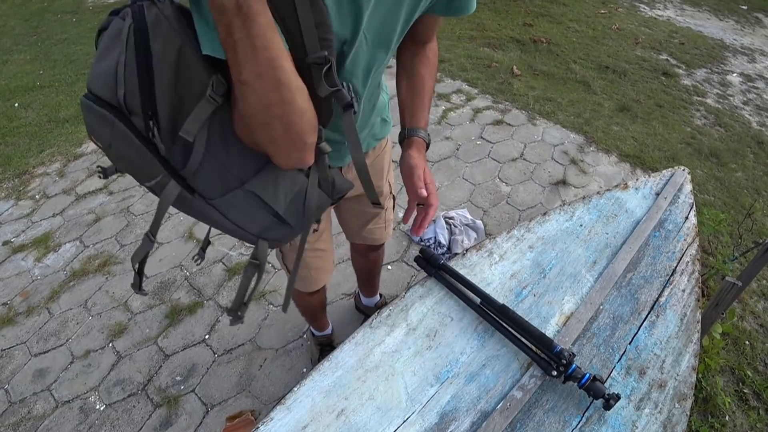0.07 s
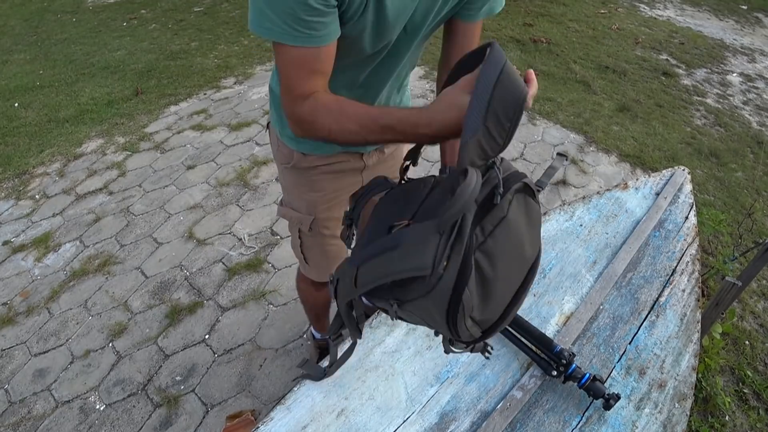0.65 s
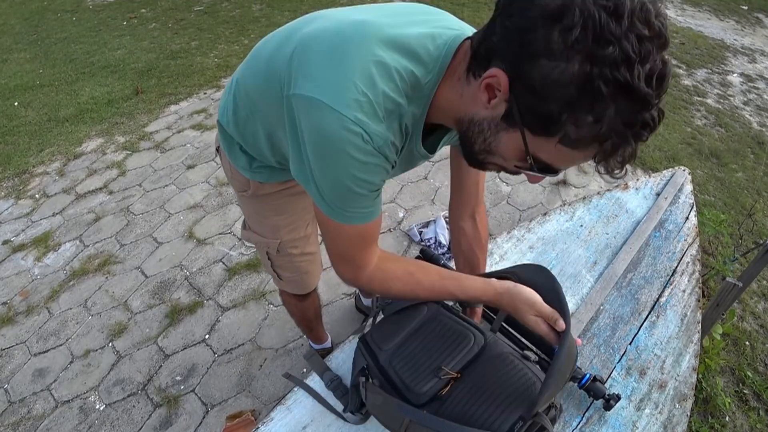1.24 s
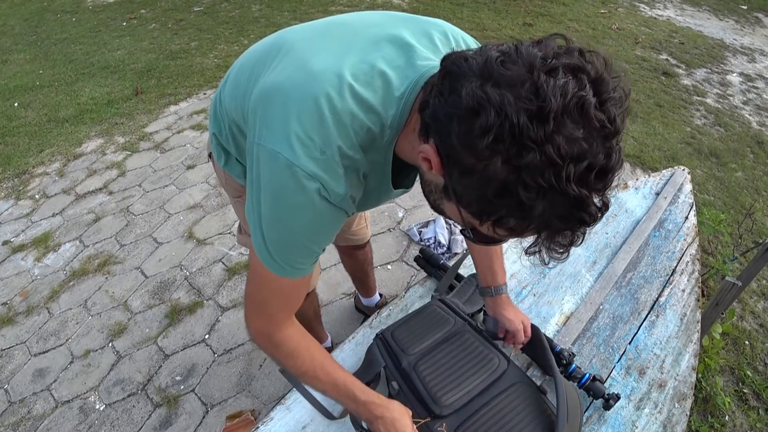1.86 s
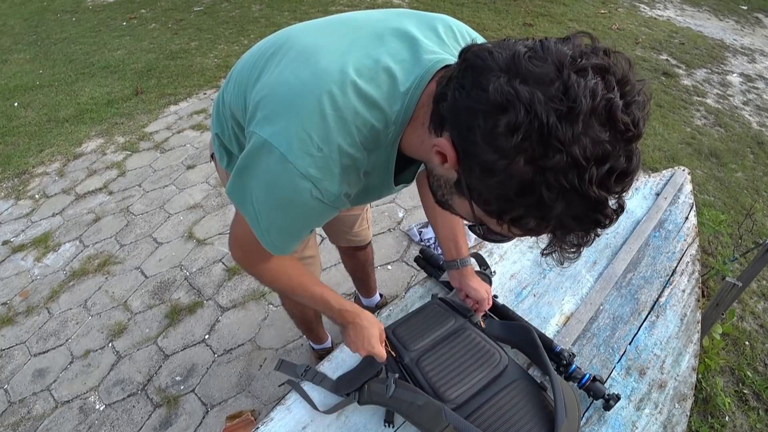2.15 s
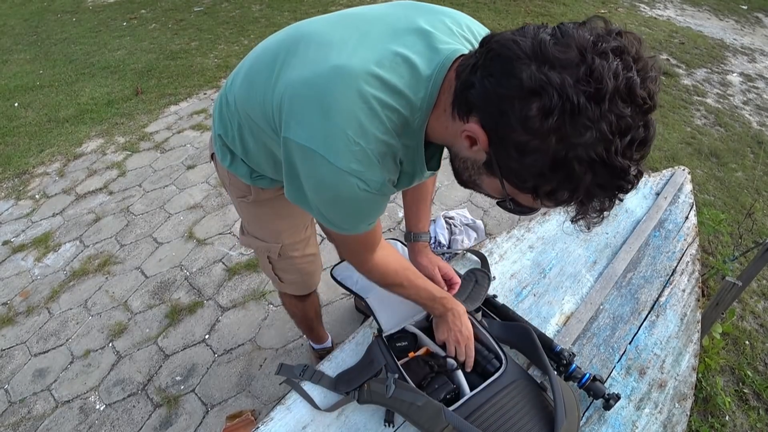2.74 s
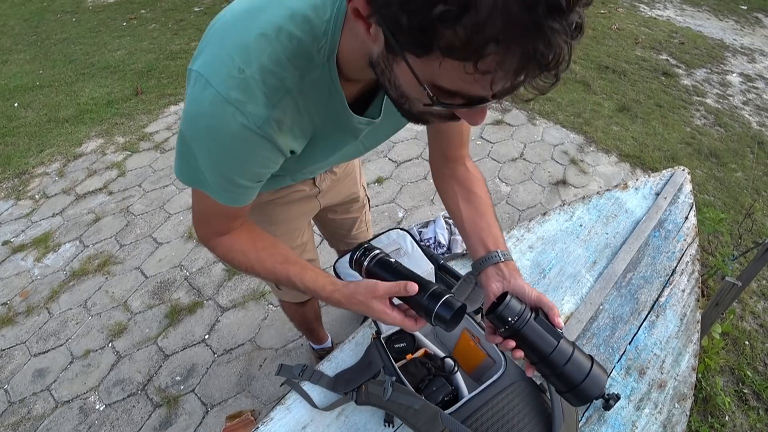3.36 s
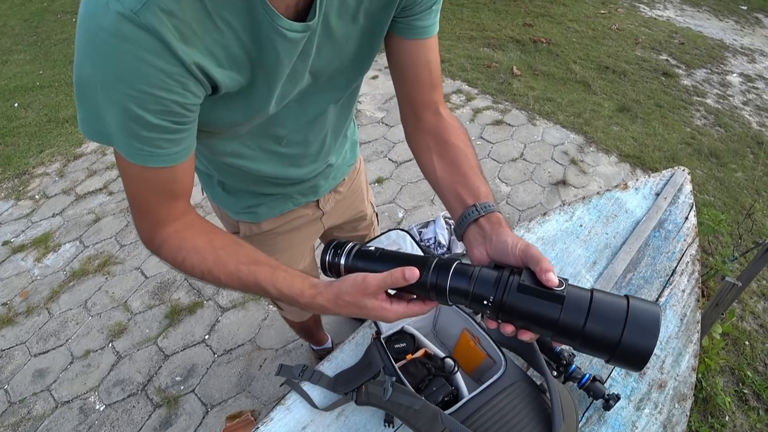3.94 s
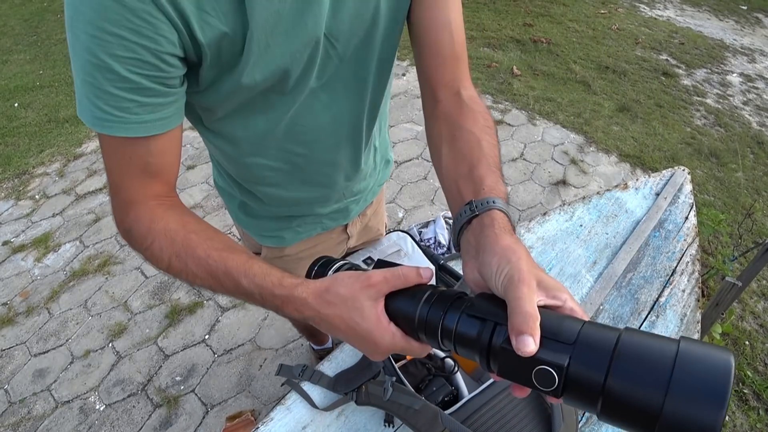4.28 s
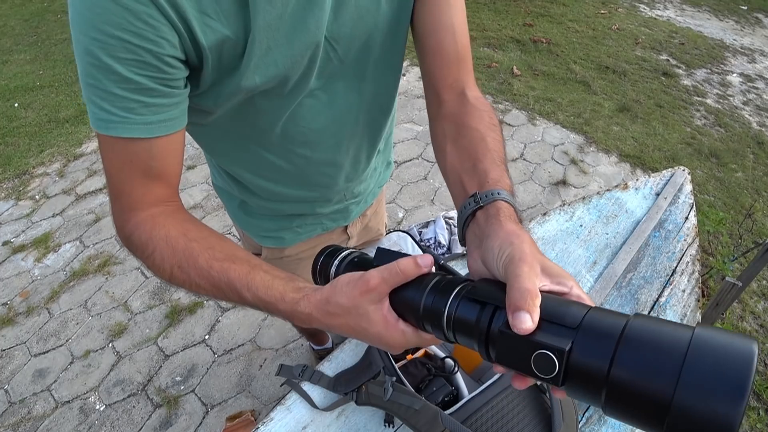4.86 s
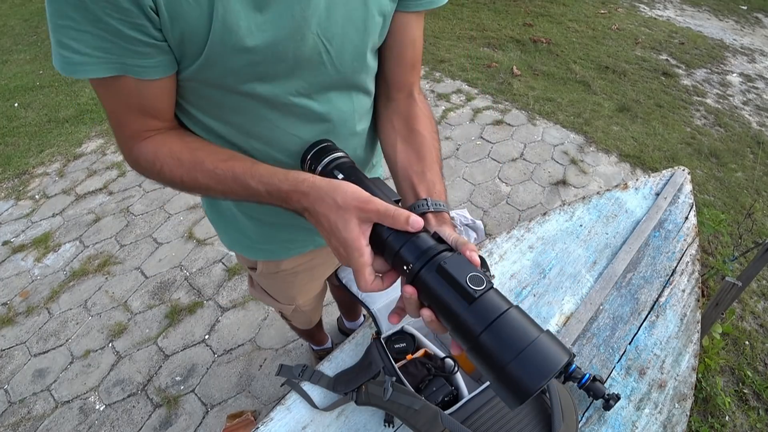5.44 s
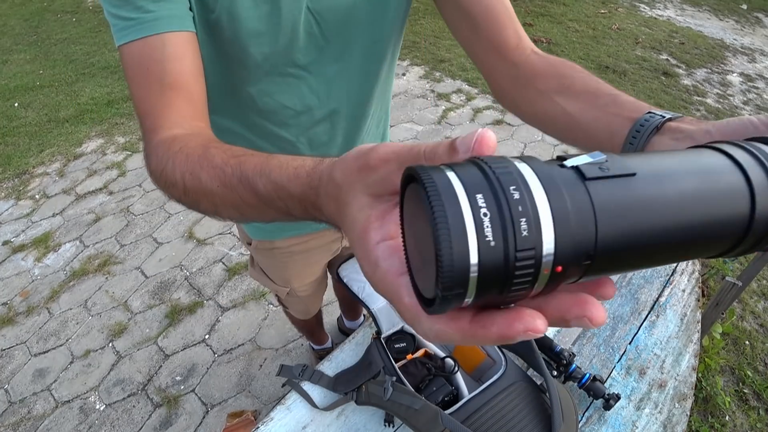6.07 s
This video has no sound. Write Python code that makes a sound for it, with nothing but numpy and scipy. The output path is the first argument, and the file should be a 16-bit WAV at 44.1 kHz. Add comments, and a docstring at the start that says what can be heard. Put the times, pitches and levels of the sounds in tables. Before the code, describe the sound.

In the open air, gusts rumble on the microphone above a faint wash of surf. Nylon rustles and buckles tap as a padded bag is swung down and thuds onto an upturned boat. Its zipper runs open, and light clinks follow as hands reach inside. The second half brings the sharpest sounds: a lens being handled, with clusters of hard clicks, brief scrapes, soft finger rubbing and bright metallic rattles.

```python
"""A nylon camera backpack is swung off a shoulder, set on an upturned boat and unzipped by the sea.
Friction makes its weave hiss, its padding buckles, the hull thuds, and a slider trips over zip teeth.
A long lens is lifted out and fitted to its mount: impacts excite damped plastic shells, stick-slip
friction gives short scrapes, and a small loose metal part jingles in its free modes.
Turbulent wind bumps the microphone over a faint wash of surf."""
import sys
import numpy as np
from scipy import signal
from scipy.fft import rfft, irfft
from scipy.io import wavfile
from scipy.ndimage import uniform_filter1d, minimum_filter1d

SR = 44100
rng = np.random.default_rng(int(sys.argv[2]) if len(sys.argv) > 2 else 0)


def put_to_file(sound):
    """Save the sound as 16-bit audio at rate SR, in the file named by the first command-line argument."""
    columns = np.atleast_2d(sound).T  # one column per channel
    safe = np.clip(columns, -1, 1)
    whole_steps = np.round(safe * 32767)
    wavfile.write(sys.argv[1], SR, whole_steps.astype(np.int16))


N = 269451
TIME = np.arange(N) / SR

# Modes of the loose metal part. Each row: frequency in Hz, relative level in dB, T60 in seconds.
METAL_MODES = [(1680, -13, .045), (2330, -17, .03), (3240, -9, .06), (4535, 0, .06), (4800, -7, .022),
               (5750, -11, .02), (8335, 0, .065), (8650, -8, .02), (9365, -1, .055), (12985, 2, .05)]


def gain_of(db):
    """Amplitude grows tenfold for every 20 dB."""
    return 10 ** (np.asarray(db) / 20)


def unit_rms(x):
    """Normalises a signal to unit mean power."""
    return x / np.sqrt(np.mean(x ** 2) + 1e-20)


def equal_energy(x):
    """Normalises a transient to the energy of unit power held for 6 ms."""
    return x * np.sqrt(.006 * SR / (np.sum(x ** 2) + 1e-20))


def spectrum_db(points, hz):
    """Interpolates a spectrum on a logarithmic frequency axis."""
    knots_hz, db = np.transpose(points)
    return np.interp(np.log(hz + 1), np.log(knots_hz + 1), db)


def follow(rows):
    """Interpolates pairs of time and value linearly at every sample."""
    return np.interp(TIME, *np.transpose(rows))


def coloured(x, points):
    """Zero-phase filtering imposes a spectral envelope; the result has unit power."""
    response = gain_of(spectrum_db(points, np.fft.rfftfreq(N, 1 / SR)))
    return unit_rms(irfft(rfft(x) * response, N))


def band(x, lo_hz, hi_hz, order=2):
    """A causal, maximally flat band-pass filter."""
    edges_hz = [lo_hz, min(hi_hz, SR / 2 - 100)]
    return signal.sosfilt(signal.butter(order, edges_hz, "band", fs=SR, output="sos"), x)


def resonate(x, hz, width_hz):
    """A driven, damped resonator of unit peak gain, whose frequency may move."""
    carrier = np.exp(2j * np.pi * np.cumsum(hz * np.ones(len(x))) / SR)
    pole = np.exp(-np.pi * width_hz / SR)
    return 2 * (carrier * signal.lfilter([1 - pole], [1, -pole], x / carrier + 1e-18)).real


def wander(per_s):
    """Random modulation: straight lines join normally distributed values."""
    knots = rng.standard_normal(N // 20)
    return np.interp(TIME * per_s, np.arange(len(knots)), knots)


def slips(per_s, spread_db):
    """Stick-slip friction is a random train of impulses, a few of them large."""
    size = gain_of(spread_db * np.minimum(rng.exponential(1, N), 4)) * rng.choice([-1, 1], N)
    return unit_rms(size * (rng.random(N) < per_s / SR))


def stroke(start, end, attack_s, release_s):
    """The envelope of one move rises linearly, holds, and decays exponentially."""
    return np.clip((TIME - start) / attack_s, 0, 1) * np.exp(-np.clip((TIME - end) / release_s, 0, 20))


def strokes(rows, attack_s, release_s):
    """The envelope of a series of moves follows the strongest at each moment."""
    return np.max([gain_of(db) * stroke(start, end, attack_s, release_s) for start, end, db in rows], 0)


def add(mix, start, sound):
    """Superposes a sound on the mix from a start in seconds."""
    part = mix[max(round(start * SR), 0):][:len(sound)]
    part += sound[:len(part)]


def ring(modes, scatter_db):
    """Free vibration: one decaying sinusoid per mode, with random phase and scattered strength."""
    hz, db, t60 = np.transpose(modes)[:, :, None]
    t = TIME[:SR // 4]
    strength_db = db + scatter_db * rng.standard_normal(hz.shape)
    return gain_of(strength_db - 60 * t / t60) * np.sin(2 * np.pi * (hz * t + rng.random(hz.shape)))


def small_radiator(x):
    """A body much smaller than the wavelength radiates almost no bass."""
    return band(x, 1800, 15000, order=3)


def nylon_swish():
    """Sliding friction makes the weave hiss against a shirt and against itself."""
    # Spectrum of sliding nylon. Each row: frequency in Hz, relative level in dB.
    spectrum = [(150, -14), (500, -15), (1100, -9), (2200, -3), (4200, -1), (6500, -5.5), (9000, -7.5),
                (12000, -6), (15500, -7)]
    # Moves of the bag. Each row: start and end in seconds, level in dB.
    swishes = [(-0.03, .22, -23), (.22, .67, -28.5), (.65, .86, -36), (.85, 1.19, -32), (1.19, 1.55, -38),
               (1.55, 1.68, -32), (1.68, 1.8, -25.5), (1.8, 1.97, -42.5), (1.95, 2.14, -32),
               (2.12, 2.45, -27.5)]
    sliding = slips(per_s=7000, spread_db=3)
    snags = slips(per_s=64, spread_db=4.5)
    threads = coloured(sliding + .19 * snags, spectrum)
    # Patches of cloth tighten and slacken, so their ribbed weave sings at shifting pitches.
    ribs = sum(resonate(threads, hz * np.exp(.12 * wander(per_s=14)), width_hz=260)
               for hz in (1400, 2300, 3800, 8300))
    weave = unit_rms(threads + .17 * ribs) * gain_of(2 * wander(per_s=150))
    return weave * strokes(swishes, attack_s=.03, release_s=.025)


def padding_crumple():
    """Folds of padding buckle in coarse lumps as the load builds and settles."""
    # Spectrum of buckling padding. Each row: frequency in Hz, relative level in dB.
    spectrum = [(50, -31), (120, -16), (250, 7), (480, 1.5), (900, -0.5), (1500, -2.5), (2500, -8.5),
                (5000, -23)]
    # Loadings of the bag. Each row: peak time in seconds, relative level in dB,
    # seconds to build by 20 dB, seconds to settle by 20 dB.
    crumples = [(.42, -36, 0.4, .5), (.874, -23, 0.05, 0.33), (1.14, -17, 0.09, 0.06),
                (1.202, -18.5, .005, 0.09), (1.398, -15.5, .1, 0.1), (1.477, -25.5, 0.04, 0.24)]
    folds = coloured(slips(per_s=3000, spread_db=2), spectrum) * gain_of(2 * wander(per_s=70) - 3.5)
    load_db = np.max([db - 20 * np.maximum((peak - TIME) / build_s, (TIME - peak) / settle_s)
                      for peak, db, build_s, settle_s in crumples], axis=0)
    return folds * gain_of(load_db)


def wind():
    """Turbulent pressure buffets the microphone, deeper in the stronger gusts."""
    # Gusts. Each row: start and end in seconds, level in dB.
    gusts = [(-0.04, .05, -38.5), (.92, 1.05, -37), (1.36, 1.52, -32.5), (1.66, 1.74, -38.5),
             (1.84, 1.95, -33), (1.95, 2.11, -26.5), (2.19, 2.22, -36), (2.71, 2.94, -35.5),
             (3.125, 3.2, -23.5), (3.22, 3.32, -28), (3.37, 3.46, -37.5), (3.465, 3.55, -27),
             (3.6, 3.72, -37.5), (3.87, 4.0, -34), (4.44, 4.55, -42.5), (5.95, 6.08, -41)]
    # Spectrum of the buffeting. Each row: frequency in Hz, relative level in dB.
    spectrum = [(22, -32), (45, -27), (75, -0.5), (140, 4), (220, -6), (350, -16), (600, -43),
                (1500, -45.5)]
    breeze = gain_of(-48 + 3 * wander(per_s=9))
    strength = np.maximum(breeze, strokes(gusts, attack_s=.028, release_s=.062))
    buffet = coloured(rng.standard_normal(N), spectrum)
    rumble = unit_rms(band(rng.standard_normal(N), 45, 116.6, order=3))
    buffet += np.minimum(strength / gain_of(-34), 1) * rumble
    running_rms = np.sqrt(uniform_filter1d(buffet ** 2, size=1800))
    return strength * buffet / running_rms


def surf():
    """Distant waves sum incoherently to a broadband noise that swells slightly."""
    # Spectrum of the surf. Each row: frequency in Hz, relative level in dB.
    spectrum = [(30, -27), (70, 7.5), (150, 10), (400, 4.5), (1000, 0), (1800, -1.5), (4000, -9.5),
                (8000, -22), (15000, -12.5)]
    return coloured(rng.standard_normal(N), spectrum) * gain_of(-50 + .5 * wander(per_s=1.45))


def plastic_clacks():
    """Impact excitation: hard edges skid, catch and rebound, driving a heavily damped shell."""
    # Knocks of buckles and lens parts, and of the zip slider at its stop. Each row: time in seconds, shell
    # level in dB, # shell resonance in Hz, crack level in dB, hollow knock level in dB, contact T60 in seconds.
    # Levels are relative.
    impacts = [(0.2853, -22, 5750, -25, -37, 0.026), (.3361, -24, 2740, -24, -54, 0.011),
               (.5349, -26, 2500, -26, -58, 0.009), (.6047, -22, 5680, -19.5, -48, .014),
               (.6298, -12, 1610, -38, -33, 0.019), (.6393, -21, 1800, -28, -46, .01),
               (.6696, -19.5, 3120, -25, -38, 0.011), (0.8728, -18, 1080, -27.5, -29, .02),
               (.9756, -17.5, 3840, -39, -25.5, .01), (1.003, -19.5, 3870, -15.5, -50, 0.0082),
               (1.102, -16.5, 1060, -34, -48, 0.016), (1.1192, -13.5, 1770, -35, -17, .004),
               (1.134, -16, 980, -37, -40, .02), (1.151, -14, 4600, -12.5, -42, 0.012),
               (1.2033, -13, 1450, -19.5, -19.5, .008), (1.288, -25.5, 3200, -45, -52, 0.0054),
               (1.3492, -13, 1400, -34, -50, 0.033), (1.3704, -20, 1360, -35, -18, 0.022),
               (1.5579, -26, 3130, -25.5, -41, .01), (1.592, -26, 3400, -16.5, -35, 0.014),
               (1.609, -25, 2240, -16.5, -37, 0.0072), (1.999, -14, 1590, -24, -41, .028),
               (2.458, -21.5, 1700, -23.5, -45, 0.016), (2.6199, -35, 5600, -18, -29, 0.013),
               (2.627, -47, 5400, -22, -33, 0.014), (2.7839, -30, 1940, -27.5, -40, 0.0078),
               (2.8389, -33.5, 3670, -40, -44, .018), (3.7525, -18.5, 2900, -22.5, -34, 0.019),
               (3.8559, -11, 2800, -13, -45, 0.012), (3.9276, -30, 2920, -35, -55, 0.013),
               (4.1107, -14, 1870, -18.5, -34, 0.017), (4.2597, -14.5, 2050, -14, -33, 0.047),
               (4.2678, -0.5, 2050, 0, -11, 0.024), (4.5331, -20, 2130, -14.5, -52, 0.036),
               (4.5446, -11.5, 2200, -11, -31, 0.026), (4.559, -3.5, 3230, 0.5, -18.5, 0.026),
               (4.5968, -8.5, 5060, -19, -60, 0.022), (5.0115, -10, 2230, -16, -33, .02),
               (5.0161, -5.5, 2170, 1, -29, 0.019), (5.094, -7, 4530, -11, -38, 0.0083),
               (5.0996, -1.5, 3920, -2.5, -30.5, 0.015), (5.2472, -9.5, 2620, -9.5, -60, 0.035),
               (5.3268, -19, 2720, -17.5, -50, .013), (5.3557, -17, 2690, -15.5, -60, 0.022),
               (5.3683, -14.5, 3270, -13.5, -55, 0.0069), (5.4117, -29.5, 3140, -36, -46, .012),
               (5.6384, -5.5, 3860, 0, -55, 0.016), (5.683, -9, 2480, -7, -55, .014)]
    skid_db, skid_t60_s = -33.5, .21
    out, lead = np.zeros(N), SR // 35
    t = TIME[:SR // 9] - lead / SR
    from_peak = np.where(t < 0, -t * 2.6, t)  # the force builds faster than it dies
    for time, shell_db, hz, crack_db, knock_db, t60 in impacts:
        # A brief hard contact lies inside a softer, longer skid.
        contact = gain_of(-60 * from_peak / t60) + gain_of(skid_db - 60 * from_peak / skid_t60_s)
        force = equal_energy(rng.choice([-1, 1], len(t)) * contact) + .22 * equal_energy(1. * (t == 0))
        low_edge_hz = np.clip(.79 * hz, 800, 2100)
        broad = equal_energy(band(force, low_edge_hz, 3990, order=3))
        resonant = equal_energy(resonate(band(force, low_edge_hz, 5050), hz, width_hz=420))
        shell = gain_of(shell_db) * equal_energy(broad + 1.64 * resonant)
        crack = gain_of(crack_db) * equal_energy(band(force, 3910, 13900, order=3))
        knock = gain_of(knock_db + 1) * equal_energy(band(force, 193, 1000))
        add(out, time - .0005 - lead / SR, shell + crack + knock)
    return gain_of(-1.5) * out


def scrapes():
    """Short bursts of stick-slip friction drive the resonance of what is rubbed."""
    # Scrapes of straps, fingers and lens barrel.
    # Each row: start and end in seconds, level in dB, resonance in Hz.
    slides = [(0.402, 0.443, -28.5, 1900), (0.612, 0.665, -28.5, 1520), (0.946, 0.978, -24.5, 2360),
              (1.092, 1.155, -24.5, 1400), (1.19, 1.232, -28, 1400), (1.4, 1.464, -36, 1100),
              (1.838, 1.984, -38, 2200), (2.014, 2.11, -29.5, 3400), (2.597, 2.63, -40.5, 1470),
              (2.941, 2.98, -34.5, 8000), (2.327, 2.405, -23.5, 2400), (3.791, 3.884, -30, 2580),
              (4.071, 4.156, -36, 2000), (4.535, 4.573, -19, 2190), (4.603, 4.682, -35, 2380),
              (4.784, 4.83, -37, 2550), (4.815, 4.828, -25, 2670), (5.299, 5.345, -36, 2900),
              (4.985, 5.025, -31.5, 1970), (5.238, 5.282, -27, 2680), (5.583, 5.738, -37.5, 2800),
              (5.785, 5.85, -26.5, 3100), (5.831, 5.958, -33, 2940), (5.882, 5.931, -29.5, 2770)]
    out, friction = np.zeros(N), slips(per_s=3800, spread_db=4)
    for start, end, db, hz in slides:
        burst = friction[round(start * SR):][:round((end - start) * SR)]
        rasp = band(burst, min(.6 * hz, 2200), 3.6 * hz)
        sound = unit_rms(unit_rms(rasp) + 1.35 * unit_rms(resonate(rasp, hz, width_hz=510)))
        add(out, start, gain_of(db) * sound * signal.windows.tukey(len(sound), .5))
    return out


def thuds():
    """A soft impact swells over a few milliseconds into one low, quickly damped mode."""
    # The bag and the hull under it taking weight.
    # Each row: start in seconds, relative level in dB, frequency in Hz, T60 in seconds.
    blows = [(.875, -29, 340, .14), (.905, -19.5, 407, .07), (.954, -18, 230, 0.058),
             (.986, -21, 182.5, .18), (1.019, -17.5, 278, .07), (1.116, -21.5, 209, .07),
             (1.396, -14.5, 255, 0.072), (1.863, -20.5, 204, .05), (1.977, -16.5, 257.4, .14),
             (2.237, -14, 280, 0.094), (2.673, -19, 807, 0.022), (2.676, -12.5, 560, 0.021),
             (2.68, -31, 345, 0.063), (3.15, -22.5, 170.7, 0.26), (3.752, -19.5, 336, 0.094)]
    out, t = np.zeros(N), TIME[:SR // 4]
    swell = 1 - np.exp(-t / .0032)
    for start, db, hz, t60 in blows:
        add(out, start, gain_of(db + 5.5 - 60 * t / t60) * swell * np.sin(2 * np.pi * hz * t))
    return out


def tab_ping():
    """A zip tab, struck once, vibrates freely in its inharmonic modes."""
    # Modes of the tab. Each row: frequency in Hz, relative level in dB, T60 in seconds.
    tab_modes = [(4377, 0, .095), (4560, -5, .05), (12050, 10, .025), (12480, 5, .025)]
    out = np.zeros(N)
    add(out, start=1.1505, sound=gain_of(-11) * ring(tab_modes, scatter_db=0).sum(0))
    return small_radiator(out)


def metal_chatter():
    """After a jolt the loose metal rebounds many times; each bounce excites its impulse response."""
    # Bouts of chatter. Each row: start and end in seconds, relative level in dB.
    bouts = [(1.496, 1.514, -24.5), (2.871, 2.893, -34), (2.988, 3.011, -22.5), (4.27, 4.355, -13),
             (4.55, 4.603, -15), (5.016, 5.081, -12), (5.105, 5.143, -13.5)]
    fade_db, edge_s = -4.5, .0053
    envelope = sum(gain_of(follow([(start, db), (end, db + fade_db)]))
                   * stroke(start, end, edge_s, edge_s) for start, end, db in bouts)
    bounces = slips(per_s=1000, spread_db=.8) * envelope
    response = ring(METAL_MODES, scatter_db=1).sum(0)
    ringing = signal.oaconvolve(bounces, response / np.linalg.norm(response))[:N]
    scraping = band(bounces, 1440, 7700)
    return small_radiator(gain_of(-2.5) * ringing + gain_of(-1.5) * scraping)


def slider(teeth_per_s):
    """A slider trips over the teeth in a quasi-periodic impulse train and rasps between them."""
    teeth_passed = np.cumsum(teeth_per_s * (1 + .042 * wander(per_s=260))) / SR
    trips = np.diff(np.floor(teeth_passed), prepend=0)
    ticks = unit_rms(trips * gain_of(2.2 * rng.standard_normal(N)))
    rasp = unit_rms(rng.standard_normal(N) * np.exp(-(teeth_passed % 1) / .5))
    return ticks + .5 * rasp


def zipper():
    """Forced vibration: two sliders drive the cloth and the taut flap, which radiate the tooth impacts."""
    # Pace of the leading slider. Each row: time in seconds, speed in teeth per second.
    pace = [(1.56, 245), (1.74, 372), (1.9, 214), (2.04, 326), (2.12, 312), (2.18, 409), (2.245, 305),
            (2.3, 370), (2.46, 265)]
    # Response of the cloth. Each row: frequency in Hz, relative level in dB.
    cloth_response = [(40, -25), (120, 1), (320, 4), (520, -4.5), (950, 0.5), (1500, -2), (2300, -4),
                      (3400, -7), (6000, -17.5), (9000, -18), (13000, -20)]
    # Pulls on the zip; the flap's resonance glides as the slider rounds the bag. Each row: start and
    # end in seconds, first and last relative level in dB, first and last flap resonance in Hz.
    pulls = [(1.56, 1.71, -42.5, -19, 2160, 1850), (1.69, 1.815, -21, -23, 1830, 1690),
             (1.82, 1.97, -33, -28, 2010, 1730), (1.97, 2.3, -28.5, -21.5, 1170, 1399),
             (2.28, 2.46, -22.5, -22.5, 1410, 1870)]
    db_per_doubling, usual_teeth_per_s = 6, 331  # a faster slider is louder
    speed = follow(pace)
    teeth = slider(speed) + .45 * slider(speed * .85 * np.exp(.13 * wander(per_s=14)))
    # Bending waves along the tape are dispersive: the treble arrives before the bass.
    lag_turns = .06 * np.sqrt(np.fft.rfftfreq(N, 1 / SR))
    dispersed = irfft(rfft(teeth) * np.exp(-2j * np.pi * lag_turns), N)
    cloth = coloured(dispersed, cloth_response)
    pull, flap_hz = np.zeros(N), np.full(N, pulls[0][4])
    for start, end, first_db, last_db, first_hz, last_hz in pulls:
        effort = gain_of(follow([(start, first_db), (end, last_db)]))
        pull = np.maximum(pull, effort * stroke(start, end, attack_s=.011, release_s=.01))
        flap_hz = np.where(TIME < start, flap_hz, follow([(start, first_hz), (end, last_hz)]))
    flap = unit_rms(resonate(cloth, flap_hz * np.exp(.08 * wander(per_s=22)), width_hz=280))
    speed_gain = gain_of(db_per_doubling * np.log2(speed / usual_teeth_per_s))
    return unit_rms(cloth + .61 * flap) * pull * speed_gain


def hand_rubs():
    """Friction of skin on the gear gives a soft noise whose resonances shift with the grip."""
    # Spectrum of rubbing skin. Each row: frequency in Hz, relative level in dB.
    spectrum = [(300, -6.5), (1000, -3), (2000, -2), (5000, -2), (7000, -6.5), (9000, -6), (12000, -14),
                (15500, -5)]
    # Shifts of the hands. Each row: start and end in seconds, relative level in dB.
    shifts = [(2.42, 2.66, -42.5), (2.66, 3.03, -46), (3.03, 3.7, -58), (3.72, 3.87, -42.5),
              (4.0, 5.45, -45.5), (5.45, 5.75, -50.5), (5.75, 6.02, -43.5)]
    rub = coloured(slips(per_s=6000, spread_db=4), spectrum)
    grip = sum(resonate(rub, hz * np.exp(.15 * wander(per_s=7)), width_hz=350) for hz in (1900, 5000))
    flicker = gain_of(.8 * wander(per_s=25) + 1.5)
    return unit_rms(rub + grip) * flicker * strokes(shifts, attack_s=.026, release_s=.068)


def metal_clinks():
    """The loose metal slides up to each impact, ticks on contact and rings in its free modes."""
    # Strikes. Each row: time in seconds, relative tick level in dB, relative ring level in dB.
    strikes = [(2.5846, -13, -25.5), (2.983, -13.5, -34), (2.9903, -13, -27), (3.021, -12, -24.5),
               (3.04, -13.5, -31.5), (3.0855, -12, -29), (3.0944, -14.5, -28), (3.1217, -19, -39.5),
               (3.5761, -15, -28.5), (3.775, -21.5, -46), (3.8629, -17, -45), (3.946, -21, -44),
               (4.0014, -26.5, -52), (4.1294, -15.5, -52), (4.2904, -13, -21), (4.2975, -14, -27),
               (4.334, -12, -18), (4.345, -8.5, -35), (4.3888, -22, -35.5), (4.589, -18, -25.5),
               (4.698, -29.5, -49), (4.8258, -8, -32.5), (5.0225, -6, -26), (5.071, -7.5, -19.5),
               (5.161, -11.5, -35)]
    tick_t60_s, slide_t60_s = .026, .085
    out, t = np.zeros(N), TIME[:SR // 4]
    mode_db = np.where(np.transpose(METAL_MODES)[0] > 7000, 8.5, 9)
    for time, tick_db, ring_db in strikes:
        ringing = gain_of(ring_db + mode_db) @ ring(METAL_MODES, scatter_db=3.5)
        contact = band(rng.standard_normal(len(t)) * gain_of(-60 * t / tick_t60_s), 2700, 11400)
        # Each strike lands on another spot, with its own damped resonance.
        spot = resonate(contact, rng.uniform(2900, 6800), width_hz=380)
        tick = equal_energy(equal_energy(contact) + .7 * equal_energy(spot))
        add(out, time, gain_of(tick_db - 5) * tick + ringing)
        slide = band(rng.standard_normal(len(t)) * gain_of(-60 * t[::-1] / slide_t60_s), 1900, 8300)
        add(out, time - t[-1], gain_of(tick_db - 21) * equal_energy(slide))
    return small_radiator(out)


def limiter(x):
    """Peak limiting: the gain drops at once on a loud clack and recovers at a steady rate."""
    threshold_db, recovery_db_per_s, window = -7.5, 78, 90  # the window looks 1 ms ahead
    power_db = 10 * np.log10(abs(uniform_filter1d(x ** 2, window)) + 1e-12)
    recovery_db = TIME * recovery_db_per_s
    held_db = np.maximum.accumulate(power_db + recovery_db, axis=-1) - recovery_db
    excess_db = np.maximum(held_db - threshold_db, 0)
    gain_db = minimum_filter1d(-excess_db, window)
    return x * gain_of(uniform_filter1d(gain_db, window))


def scene():
    """Free-field superposition: in the open air the direct sounds add, without echoes."""
    bag = nylon_swish() + padding_crumple() + zipper() + thuds() + tab_ping()
    gear = plastic_clacks() + scrapes() + metal_chatter() + hand_rubs() + metal_clinks()
    return (bag + gear + wind() + surf())[None]


def record(dry):
    """The microphone port acts as a minimum-phase filter; limiting, clipping and a low-pass follow."""
    # The microphone's bass fall, port dip and treble fall. Each row: frequency in Hz, gain in dB.
    response = [(20, -12), (55, 1), (100, 0.5), (400, 0.5), (560, -1.5), (685, -18), (800, -4), (1000, 1),
                (9400, -2), (10300, -14.5), (13000, -20.5), (15500, -35)]
    size, cutoff_hz = 4096, 15900
    log_gain = np.log(gain_of(spectrum_db(response, abs(np.fft.fftfreq(size, 1 / SR)))))
    minimum_phase = np.exp(np.conj(signal.hilbert(log_gain)))
    port = np.fft.ifft(minimum_phase).real[:size // 2]
    picked_up = signal.oaconvolve(dry, port[None])[:, :N]
    clipped = np.clip(limiter(picked_up), -1, 1)
    low_pass = signal.firwin(255, cutoff_hz, window=("kaiser", 8), fs=SR)
    return signal.oaconvolve(clipped, low_pass[None], "same")


dry = scene()
out = record(dry)
put_to_file(out)
```